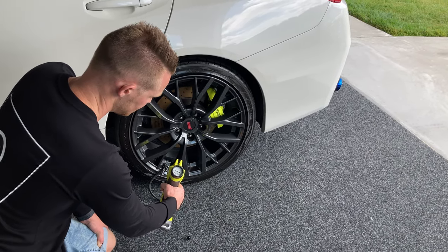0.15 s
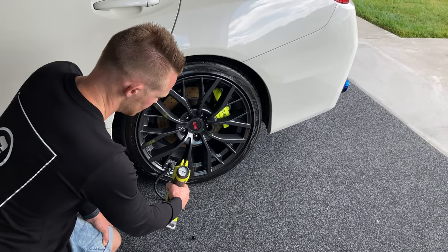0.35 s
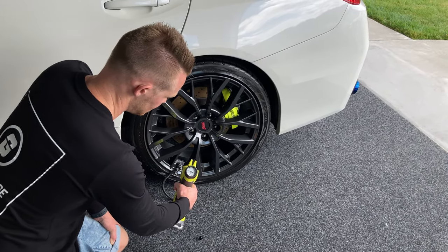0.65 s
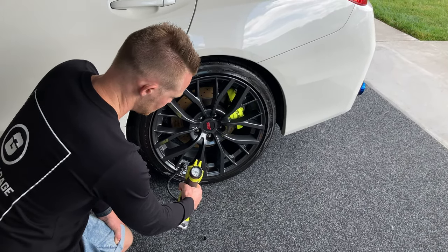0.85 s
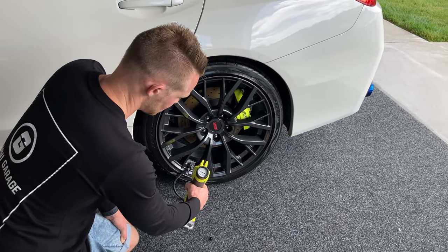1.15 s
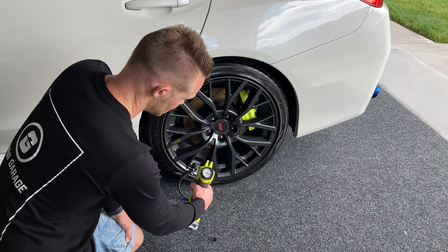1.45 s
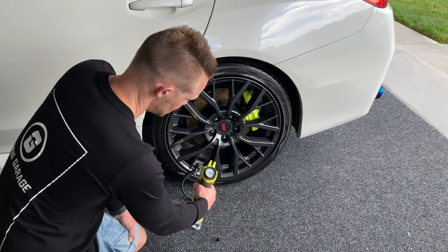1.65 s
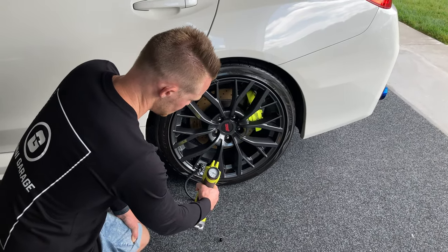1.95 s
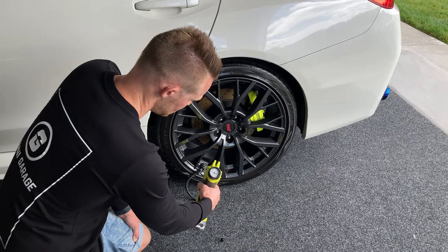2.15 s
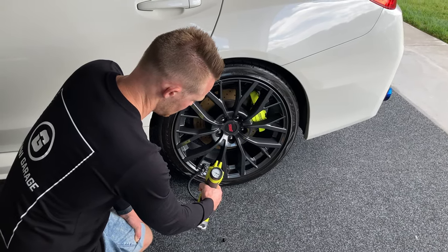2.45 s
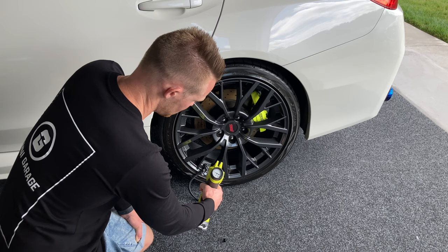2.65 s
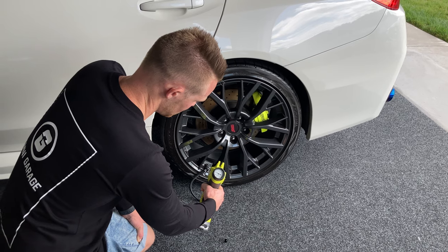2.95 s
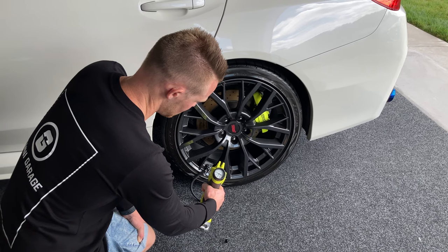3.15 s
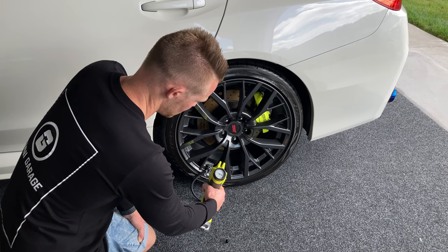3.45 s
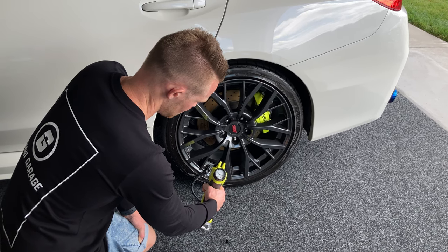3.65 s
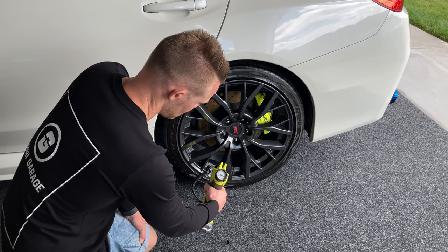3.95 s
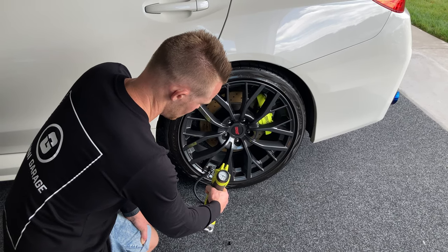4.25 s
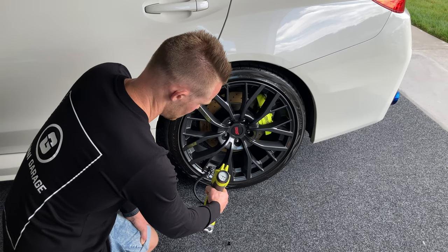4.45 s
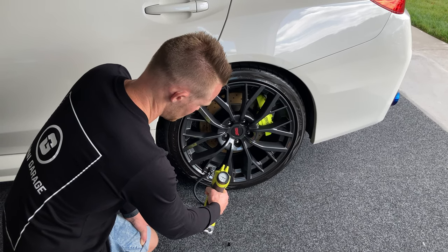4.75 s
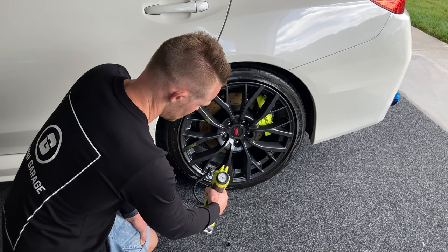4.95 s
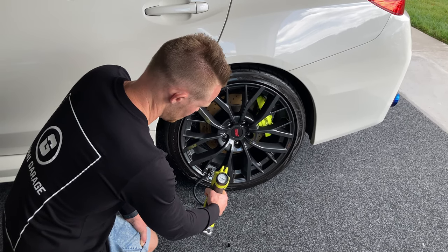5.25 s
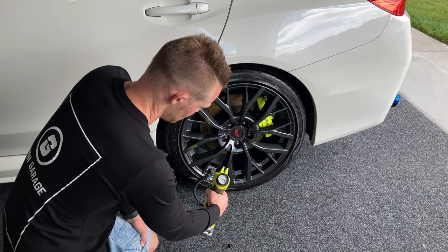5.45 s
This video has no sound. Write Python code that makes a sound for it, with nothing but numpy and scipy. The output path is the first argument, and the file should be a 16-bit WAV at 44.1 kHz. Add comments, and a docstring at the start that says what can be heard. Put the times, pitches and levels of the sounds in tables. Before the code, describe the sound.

A handheld cordless piston compressor pumps a car tyre on a driveway. It is already running and never stops, its strokes so fast they fuse into a low, rough buzz. Plastic housing knocks and rings, valves puff and rattle, gears whine and scrape, and cooling air hisses. Close, dry mono sound without noticeable echo; the pitch sags barely and the level creeps up.

```python
"""On a driveway, a small cordless piston compressor pumps a car tyre, running steadily at about 57 strokes a second.
Each stroke knocks the plastic housing, which rings, and noise puffs and rattles through the valves.
The reduction gear whines and scrapes under load, sagging in pitch towards top dead centre, while the brushes buzz.
Cooling air hisses throughout as coloured noise. The motor slows slightly and the sound grows as the tyre fills."""
import sys
import numpy as np
from scipy import signal
from scipy.fft import rfft, irfft, next_fast_len
from scipy.io import wavfile
from scipy.ndimage import map_coordinates

SR = 44100
rng = np.random.default_rng(int(sys.argv[2]) if len(sys.argv) > 2 else 0)


def wav_out(sig):
    """Save sig, one row per channel (or a flat mono array), as 16-bit PCM at SR to the path in sys.argv[1]."""
    wavfile.write(sys.argv[1], SR, np.round(np.clip(np.atleast_2d(sig).T, -1, 1) * 32767).astype(np.int16))


N = 247401

GEAR_RATIO = 4.6  # motor turns per crank turn


def amp(db):
    """Turn decibels into a gain."""
    return 10 ** (np.asarray(db) / 20)


def unit(x):
    """Scale a sound to an average (rms) strength of 1."""
    return x / np.sqrt(np.mean(x ** 2) + 1e-20)


def along(points, hz):
    """Read a curve of (frequency, value) points, with straight lines on a log frequency axis."""
    frequency, value = np.transpose(points)
    return np.interp(np.log(hz + 1e-3), np.log(frequency), value)


def wobble(rate):
    """A smooth random curve through this many random points a second."""
    points = rng.standard_normal(int(N * rate / SR) + 4)
    return map_coordinates(points, [np.arange(N) * rate / SR])


def filtered(x, response):
    """Multiply the spectrum of a sound by a gain that depends on frequency."""
    size = next_fast_len(N + SR // 2)
    hz = np.fft.rfftfreq(size, 1 / SR)
    return irfft(rfft(x, size) * response(hz), size)[:N]


def vented(x, spectrum):
    """Colour a sound as it leaves through the shell and vents, whose narrow peaks and notches shape it; rms 1."""
    # Peaks and notches of the shell. Each row: centre in Hz, width in Hz, height in dB.
    shell = [(734, 120, -2), (840, 79, 3.5), (1250, 240, 0.5), (3205, 120, -2), (2940, 59, -2),
             (3630, 100, 1), (3770, 330, -6), (4120, 59, -6.5), (4530, 190, -0.5), (4650, 150, -14),
             (5130, 76, 1), (6220, 120, 6), (6300, 130, -4), (6860, 150, 0), (8880, 360, -7),
             (14000, 500, -6), (15000, 600, -5)]

    def response(hz):
        level_db = along(spectrum, hz)
        for centre, width, db in shell:
            level_db = level_db + db / (1 + (2 * (hz - centre) / width) ** 2)
        return amp(level_db)

    return unit(filtered(x, response))


def hiss(spectrum):
    """Random noise of rms 1 that leaves through the shell."""
    return vented(rng.standard_normal(N), spectrum)


def repeating(turns, size):
    """A rough surface of this many steps, rubbed in the same way on every turn."""
    surface = irfft(np.exp(2j * np.pi * rng.random(size // 2 + 1)))
    return unit(map_coordinates(surface, [turns % 1 * size], mode="grid-wrap"))


def since_turn(crank, turn):
    """Turns since the nearest pass of this place in the turn; negative ahead of it."""
    return (crank - turn + .5) % 1 - .5


def bump(crank, turn, width):
    """A bell-shaped swell at the same place in every turn."""
    return np.exp(-.5 * (since_turn(crank, turn) / width) ** 2)


def lurching(crank, rate):
    """The true crank angle: it races on the return, stalls against compression and springs forward after the top."""
    # changes of speed as shares of the mean; places and widths in turns
    race = .059 * np.cos(2 * np.pi * (crank - .732))
    stall = .201 * bump(crank, .904, .041)
    spring = .173 * bump(crank, .263, .044)
    lurch = race - stall + spring
    return crank + np.cumsum((lurch - lurch.mean()) * rate) / SR


def cooling_air(air_db=-4.0):
    """Cooling air rushes as steady noise through the vents, its level wavering a little."""
    # Colour of the air. Each row: frequency in Hz, relative level in dB per Hz.
    air = [(40, -31), (180, -21), (450, -9.5), (900, -3), (1480, -4.5), (1850, -12), (3150, 0),
           (4600, -4.5), (5400, -9), (6800, -14.5), (8200, -12.5), (10300, -14.5), (11400, -23),
           (15700, -18)]
    return amp(air_db + .4 * wobble(14)) * hiss(air)


def motor(crank, angle, buzz_db=-8, waver=.012, strain=0.13, give=0.34):
    """Brushes buzz and the rotor sings once per turn, louder under compression; inertia evens out the crank's lurch."""
    # Tones of the rotor and its fan. Each row: multiple of the motor speed, relative level in dB.
    rotor_tones = [(1, -32), (4, -23.5), (6, -30), (11, -17), (12, -23)]
    # Colour of the brush buzz. Each row: frequency in Hz, relative level in dB per Hz.
    brush_colour = [(260, -37), (800, -6), (1500, -2.5), (1900, -10.5), (3000, 6.5), (6000, 0),
                    (10000, -13.5), (15000, -10)]
    # give is the share of the crank's lurch that reaches the rotor; waver is in motor turns
    rotor = GEAR_RATIO * (crank + give * (angle - crank)) + waver * wobble(40)
    tones = 0
    for multiple, db in rotor_tones:
        tones = tones + amp(db) * np.sin(2 * np.pi * (round(multiple) * rotor + rng.random()))
    buzz = amp(buzz_db) * vented(repeating(rotor, size=168), brush_colour)
    compression = 1 + strain * np.cos(2 * np.pi * crank)
    return compression * (np.sqrt(2) * tones + buzz)


def gear_load(crank, idle_db=-29, scrape_idle_db=-15, scrape_share=.2, squeeze_db=-4.5, squeeze_turns=0.091):
    """Levels in dB of the mesh tone, its octave and the scrape, which follows both and grows under compression."""
    # Places where the teeth come under load in every turn. Each row: turns after top dead centre,
    # width in turns, relative level of the mesh tone in dB, relative level of its octave in dB.
    loads = [(.29, 0.027, -5, -19), (.68, 0.051, -2.5, -3), (.76, 0.027, -2.5, -4.5),
             (0.845, 0.018, -25, 2), (0.918, 0.015, -1, -17), (0.998, 0.029, -3.5, -19)]
    first = second = amp(idle_db)
    for turn, width, first_db, second_db in loads:
        swell = bump(crank, turn, width)
        first = first + amp(first_db) * swell
        second = second + amp(second_db) * swell
    squeeze = amp(squeeze_db) * bump(crank, 0, squeeze_turns)
    scrape = amp(scrape_idle_db) + scrape_share * np.hypot(first, second) + squeeze
    return 20 * np.log10([first, second, scrape])


def gears(angle, first_db, second_db, tooth_db, drift=0.14, chatter=0.0063, rough_db=0.75,
          whine_db=0.0, overtone_db=-0.26, scrape_db=-9):
    """Tooth contacts whine at the mesh rate and its octave, and scrape while the gear is under load."""
    # Colour of the tooth scrape. Each row: frequency in Hz, relative level in dB per Hz.
    scrape_colour = [(3000, -33), (8000, -9), (10300, 1), (11200, -4.5), (12100, -14), (13900, -16),
                     (15000, -1), (15800, -4)]
    # 46 crank teeth; slow drift and fast chatter in teeth
    mesh = 2 * np.pi * (46 * angle + drift * wobble(9) + chatter * wobble(170))
    whine = amp(whine_db + first_db + rough_db * wobble(340)) * np.sin(mesh)
    overtone = amp(overtone_db + second_db + rough_db * wobble(260)) * np.sin(2 * mesh)
    # each tooth slides in with a tiny burst of noise
    bursts = unit((1 + np.cos(mesh)) ** 2)
    scrape = amp(scrape_db + tooth_db) * bursts * hiss(scrape_colour)
    return np.sqrt(2) * (whine + overtone) + scrape


def airflow(crank, attack_turns=0.03, fall_db_per_turn=49):
    """Level of the valve air in dB: each puff opens fast and dies away, over air that leaks past the piston."""
    # The valves open twice a turn, outlet then inlet. Each row: turns after top dead centre, relative level in dB.
    puffs = [(.034, -0.85), (.275, -10)]
    # the leak is strongest under compression, at 0.97 of a turn
    leak_db = -17 + 5.5 * np.cos(2 * np.pi * (crank - 0.97))
    power = amp(leak_db) ** 2
    for turn, db in puffs:
        since = since_turn(crank, turn)
        opening = bump(crank, turn, attack_turns)
        dying = amp(-fall_db_per_turn * since)
        power = power + (amp(db) * np.where(since < 0, opening, dying)) ** 2
    return 10 * np.log10(power)


def valve(crank, valve_db, scatter_db=1, pattern_db=0.7, rattle=0.84):
    """Air noise and a rattle swell with the valve air; the gears meet in a pattern of five strokes that varies it."""
    # Colour of the valve puff. Each row: frequency in Hz, relative level in dB per Hz.
    puff_colour = [(300, -28), (1100, -18), (1900, -15), (3200, 0.5), (4400, 3), (6200, -2.5), (6800, -3.5),
                   (7700, 2.5), (8400, -8.5), (9500, -0.5), (10300, -5.5), (11200, -17.5), (14000, -29),
                   (15100, -8.5)]
    stroke = np.floor(crank + .5).astype(int)
    chance_db = scatter_db * rng.standard_normal(stroke.max() + 1)[stroke]
    meshing_db = pattern_db * np.cos(2 * np.pi * GEAR_RATIO * stroke)
    rush = rng.standard_normal(N) + rattle * repeating(crank, size=768)
    return amp(valve_db + chance_db + meshing_db) * vented(rush, puff_colour)


def ringing(gain_db, size):
    """The ring with this gain at each frequency that starts at once and never ahead of its blow (minimum phase)."""
    cepstrum = irfft(gain_db * np.log(10) / 20)
    cepstrum[1:size // 2] *= 2
    cepstrum[size // 2 + 1:] = 0
    return irfft(np.exp(rfft(cepstrum)))


def knock(crank, rate, scatter_db=-0.06, jitter_s=.00003, spread_s=0.001285, spread_hz=1600, lead_turns=.035):
    """One blow per stroke rings the housing; its higher bending waves arrive a little later."""
    # How the housing answers a stroke. Each row: multiple of the stroke rate, relative level in dB.
    housing = [(1, -14.5), (2, -3), (3, -18), (4, -5.5), (5, -13.5), (6, -6.5), (7, -11), (8, -6), (9, 1.5),
               (10, 3.5), (11, -9.5), (12, -24), (13, -5.5), (14, -7), (15, 0), (16, -1), (17, -11),
               (19, -13.5), (20, -4), (21, -20), (22, -6.5), (24, -10.5), (25, -1.5), (26, -2), (28, -18.5),
               (34, -37), (40, -12), (45, -7), (56, -30), (90, -36)]
    size = 8192  # samples in one ring
    hz = np.fft.rfftfreq(size, 1 / SR)
    # fade below about 35 Hz and above about 6000 Hz
    edges_db = -10 * np.log10(1 + (35 / (hz + 1)) ** 6 + (hz / 6000) ** 8)
    ring = ringing(along(housing, hz / rate) + edges_db, size)
    # the delay grows with frequency up to spread_hz; summing it gives the phase turn
    delay = spread_s * np.minimum(hz / spread_hz, 1)
    late = np.exp(-2j * np.pi * np.cumsum(delay) * SR / size)
    body = irfft(rfft(ring) * late)
    # each blow lands just ahead of top dead centre, with small chance in time and strength
    strokes = np.arange(1, int(crank[-1]) + 1) - lead_turns
    chance = rng.standard_normal((len(strokes), 2))
    at = np.interp(strokes, crank, np.arange(N)) + jitter_s * SR * chance[:, 0]
    place = np.clip(np.round(at).astype(int), 0, N)
    blows = np.bincount(place, amp(scatter_db * chance[:, 1]), N + 1)[:N]
    return unit(signal.fftconvolve(blows, body)[:N])


def scene(valve_gain_db=1.9, knock_db=-43.5, treble_db=-41.0, rise_db_per_s=0.0738):
    """Every moving part follows the crank, and the whole sound grows with the tyre pressure."""
    t = np.arange(N) / SR
    # strokes per second: settles just after the start, then sags steadily as the tyre fills
    rate = 57.56 - .039 * t + .1765 * np.exp(-t / 1.0)
    crank = .3643 + np.cumsum(rate) / SR  # in turns; whole numbers are top dead centre
    angle = lurching(crank, rate)
    air = cooling_air()
    drive = motor(crank, angle) + gears(angle, *gear_load(crank))
    puffing = amp(valve_gain_db) * valve(crank, airflow(crank))
    treble = air + drive + puffing
    # the knock is added with its sign reversed
    tool = amp(treble_db) * treble - amp(knock_db) * knock(crank, rate.mean())
    return (amp(rise_db_per_s * t) * tool)[None]


def record(dry):
    """Keep only what lies below 15730 Hz, so the very highest treble is missing."""
    return filtered(dry[0], lambda hz: hz < 15730)[None]


dry = scene()
out = record(dry)
wav_out(out)
```